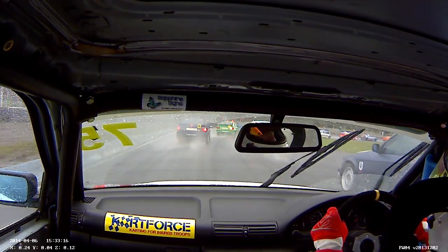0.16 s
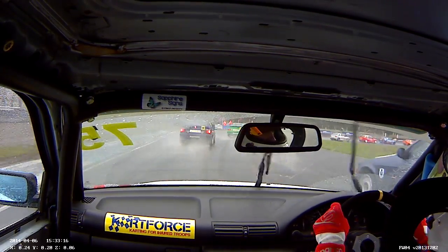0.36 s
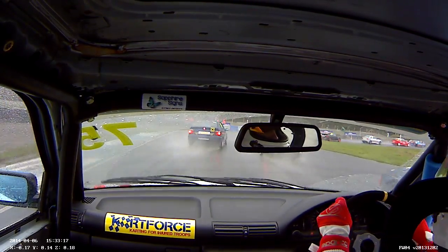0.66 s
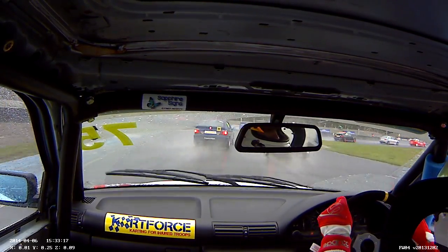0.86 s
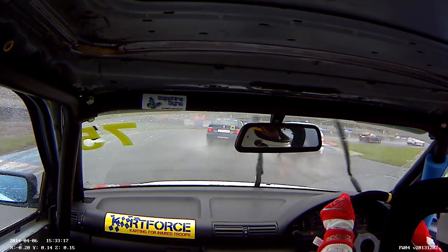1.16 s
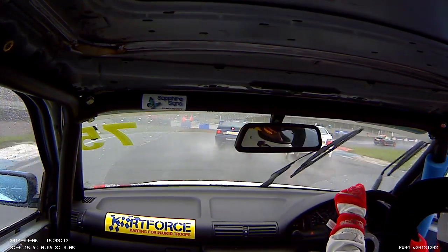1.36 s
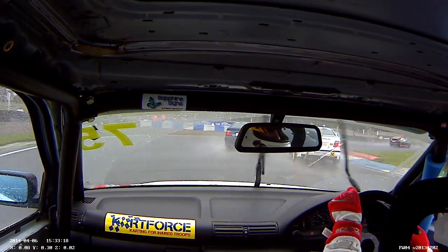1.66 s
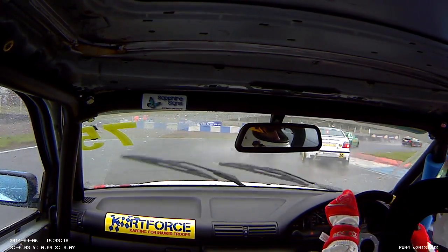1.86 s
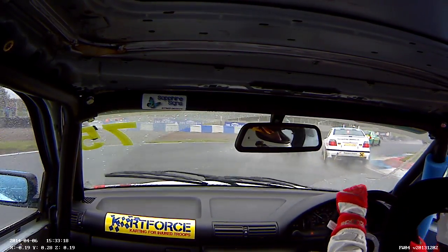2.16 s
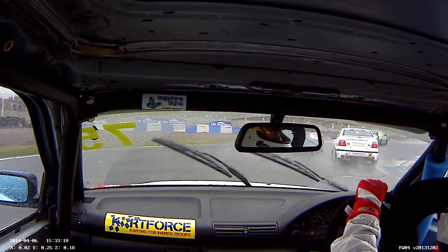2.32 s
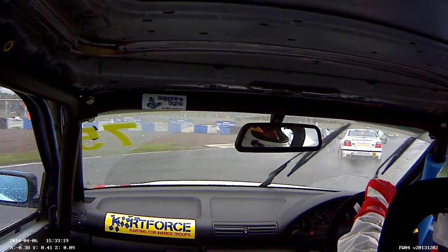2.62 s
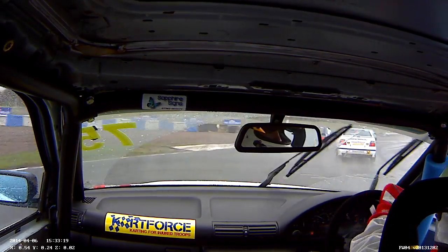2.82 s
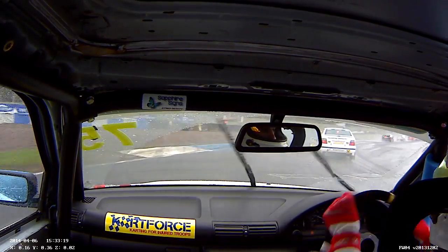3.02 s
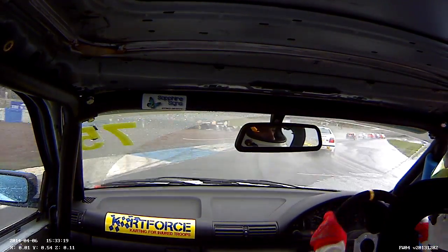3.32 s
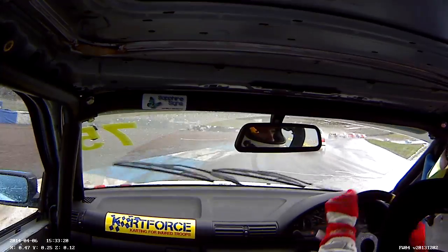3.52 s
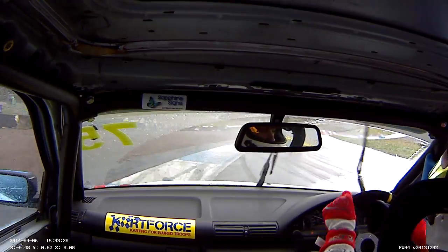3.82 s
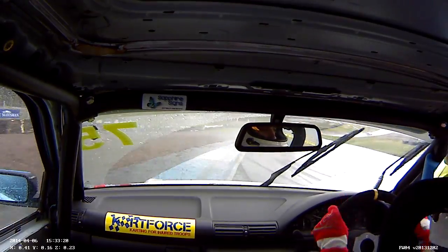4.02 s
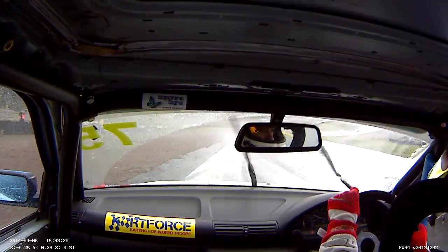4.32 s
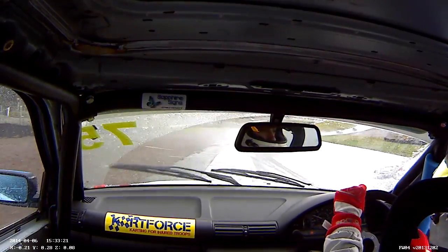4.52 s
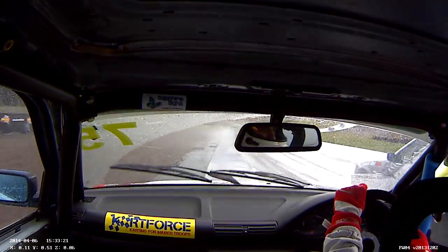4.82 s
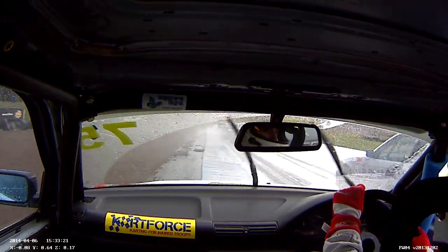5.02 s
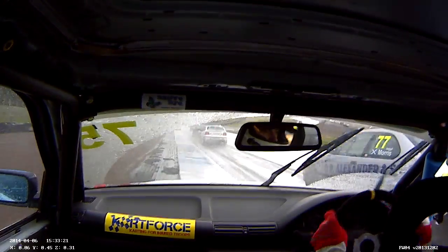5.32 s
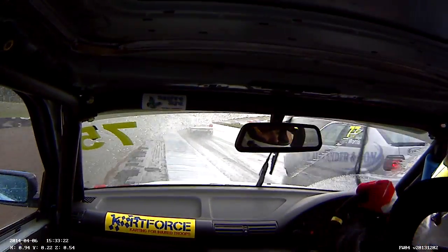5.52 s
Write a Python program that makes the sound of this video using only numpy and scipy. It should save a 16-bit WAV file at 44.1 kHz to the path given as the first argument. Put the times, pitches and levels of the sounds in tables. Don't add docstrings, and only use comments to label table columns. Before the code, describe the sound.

A mono recording inside a stripped race car on a wet track, picked up by a small camera whose case gives the highs a hollow colour. At first the engine coasts, a low drone sinking steadily from 0 to about 3.1 seconds, over deep rumble, booming shell roar and constant thin spray hiss. Small splashes tick at 0.35 and 0.8 seconds; the body shakes harder around 1.6. At 2.7 a heavy kerb thump overloads the microphone, with rattle and a burst of water, followed by a sharper knock near 3.1. From about 3.7 the throttle opens and the drone climbs, fuller and buzzier, briefly stuttering around 5.2. A rival's higher, harder exhaust emerges from 4.3 and grows alongside, with another faint car behind. Thumps return at 5.0, 5.2 and 5.6 as road roar swells. At 5.64 a stone cracks brightly, with tiny rapid bounces, amid a final heavy jolt.

```python
import sys
import numpy as np
from scipy import signal
from scipy.fft import rfft, irfft
from scipy.io import wavfile
from scipy.ndimage import uniform_filter1d

SR = 44100
rng = np.random.default_rng(int(sys.argv[2]) if len(sys.argv) > 2 else 0)


def field_ratio(decibels):
    return 10 ** (np.asarray(decibels, dtype=float) / 20)


def generate_wav(sig):
    pcm = np.round(np.clip(np.atleast_2d(sig).T, -1, 1) * 32767).astype(np.int16)
    wavfile.write(sys.argv[1], SR, pcm)


N = 250047
T = np.arange(N) / SR
HZ = np.fft.rfftfreq(N, 1 / SR)

# (time [s], firing rate [Hz], firing tone level [dB])
ENGINE_CURVE = [(0.0, 148.7, -36), (0.4, 143.1, -37.5), (1.23, 126.3, -27), (1.45, 120.8, -19),
                (1.88, 113.1, -22.5), (2.51, 104.8, -24.5), (2.84, 95.5, -23), (3.11, 90.46, -21),
                (3.36, 91.8, -24), (3.62, 90.04, -24.5), (3.81, 98.6, -20), (4.07, 99, -20.5),
                (4.42, 102.4, -17), (4.74, 106.4, -17), (5.05, 118.4, -14), (5.15, 125, -15.5),
                (5.4, 121.4, -19), (5.67, 143.8, -20)]


def unit(x):
    return x / np.sqrt(np.mean(x ** 2))


def columns(table):
    times, *values = np.transpose(table)
    return [np.interp(T, times, column) for column in values]


def walk(rate):
    hold = int(SR / rate)
    steps = np.repeat(rng.standard_normal(N // hold + 1), hold)
    return 0.8 * uniform_filter1d(uniform_filter1d(steps, hold), hold)[:N]


def shaped(points, x):
    hz, db = np.transpose(points)
    curve_db = np.interp(np.log(HZ + 1), np.log(hz), db, left=-80, right=-80)
    return unit(irfft(rfft(x) * field_ratio(curve_db), N))


def hollow(hz, centre_hz, width_hz):
    return 1 / (1 + 1j * (hz ** 2 - centre_hz ** 2) / (np.maximum(hz, 1) * width_hz))


def burst(start, rise, fall):
    t = np.maximum(T - start, 0)
    return (1 - np.exp(-t / max(rise, 1e-4))) * np.exp(-t / max(fall, 1e-3))


def tone(turns, multiple, wobble_db, rate):
    loudness = np.sqrt(2) * field_ratio(wobble_db * walk(rate))
    return loudness * np.sin(2 * np.pi * multiple * turns + 0.28 * wobble_db * walk(rate))


def panels(hz):
    # (frequency [Hz], width [Hz], lift [dB])
    door_modes = [(280, 40, 5), (370, 40, 3), (595, 60, 9), (682, 24, 9), (755, 26, 17), (788, 18, 5),
                  (850, 22, 12), (890, 35, 11)]
    return 1 + sum(field_ratio(up_db) * abs(hollow(hz, f, w)) ** 2 for f, w, up_db in door_modes)


def engine():
    # (multiple of firing rate, level coasting [dB], level on throttle [dB])
    overtone_levels = [(.5, -16, -14), (1.5, -30, -28), (2, -26, -15), (2.5, -22, -24), (3, -32, -20),
                       (4, -29, -26), (5, -36, -28), (6, -38, -37), (7, -40, -36), (8, -40, -35)]
    # (time [s], share of throttle open)
    throttle_curve = [(0, 0), (3.55, 0), (3.8, 1), (5.1, 1), (5.2, .4), (5.67, .4)]
    # (time [s], depth [dB], length [s])
    skips = [(2.762, -12, 0.029), (2.91, -25, 0.032), (3.672, -2, 0.058), (5.163, -28, 0.058),
             (5.24, -6, 0.062), (5.366, 0, 0.038), (5.475, -26, .03), (5.568, -16, 0.11)]
    hz, db = columns(ENGINE_CURVE)
    throttle = columns(throttle_curve)[0]
    for s, depth_db, length in skips:
        db = db + depth_db * np.exp(-(2 * (T - s) / length) ** 2)
    hz = uniform_filter1d(hz, SR // 20)
    turns = np.cumsum(hz) / SR
    overtones = 0
    for k, coasting_db, open_db in overtone_levels:
        level = field_ratio(coasting_db + (open_db - coasting_db) * throttle)
        overtones = overtones + level * panels(k * hz) * tone(turns, k, 4.6, 9)
    return field_ratio(db) * tone(turns, 1, 1.5, 14) + field_ratio(-28.5 + 1.9 * throttle) * overtones


def road():
    # (time [s], bumpiness [dB], tyre load [dB])
    track = [(0.0, -0.5, 1.7), (0.33, 4, -0.6), (0.65, -6.5, -2), (1.1, -2.5, 0.2), (1.45, -2, -0.3),
             (1.59, 9, 2.7), (1.75, 2.2, -0.3), (1.9, 5, 0.7), (2.26, -2.5, -1.8), (2.62, -6.5, -1.8),
             (3.0, -1, 3), (3.35, 5.5, 1.5), (3.81, 1, 2.4), (4.05, -5, 4), (4.61, -7.5, 4), (5.05, 10, 9),
             (5.5, 7, 6.5), (5.67, 1, 8)]
    # (time [s], level [dB])
    kerb_hits = [
        (2.72, -1.5),
        (3.09, -9),
    ]
    # (level at rest [dB], per bumpiness [dB/dB], per load [dB/dB],
    # per octave of revs [dB], kerb level [dB])
    ranges = [
        (-27.5, 0.97, 0.38, -2, -57),
        (-35, -0.1, 1.65, -3.0, -21.5),
        (-35, -0.1246, 0.94, -0.5, -40.5),
        (-40.5, -0.17, 0.69, 4.0, -29.5),
    ]
    # (frequency [Hz], level per Hz [dB])
    roar = [(60, -1), (130, 4), (220, -3), (300, -5.5), (400, -11.5), (470, -8.5), (520, -13), (640, -15),
            (900, -29.5)]
    # (frequency [Hz], level per Hz [dB])
    drum = [(500, -20), (700, -6.5), (890, 1), (1000, -1), (1180, -3), (1280, -12), (1400, -21)]
    shake = [(5, -25.0), (12, 5.0), (22, -6.5), (30, -12), (38, 4.4)]
    boom = [(28, -17.0), (47, 2), (70, -3.0), (95, -1)]
    colours, trims_db = [shake, boom, roar, drum], (2.2, 4.2, 3.58, 1.2)
    jolts_db = 0.25 * walk(25)
    bumps, load = columns(track)
    revs = np.log2(columns(ENGINE_CURVE)[0] / 110)
    kerbs = sum(field_ratio(db + 6.5) * burst(s, 0.011, 0.035) for s, db in kerb_hits)
    sound = 0
    for k, (db, per_bump, per_load, per_octave, kerb_db) in enumerate(ranges):
        level = field_ratio(db + per_bump * bumps + per_load * load + per_octave * revs) + field_ratio(kerb_db) * kerbs
        flicker_db = trims_db[k] + 0.99 * walk(12) + jolts_db * (k > 1)
        sound = sound + level * field_ratio(flicker_db) * shaped(colours[k], rng.standard_normal(N))
    return sound


def in_case(x, tilt_db):
    # (frequency [Hz], width [Hz], level [dB])
    case_modes = [(1424, 515, -8.5), (2018, 184, 2.5), (2655, 360, -7.5), (3650, 275, -3.5),
                  (4363, 338, 1.5), (4887, 900, -0.5), (5648, 604, -3.5), (6660, 760, -14.5)]
    # (frequency [Hz], width [Hz], depth [0-1])
    notch_hz, notch_width_hz, notch_depth = (6440, 550, 0.34)
    gain = 0
    for k, (f, w, db) in enumerate(case_modes):
        gain = gain + (-1) ** k * field_ratio(db) * hollow(HZ, f, w)
    gain = gain * (1 - notch_depth * hollow(HZ, notch_hz, notch_width_hz))
    gain = gain * field_ratio(tilt_db * np.log2(np.maximum(HZ, 800) / 4000))
    steep_top = 1 / np.sqrt(1 + (HZ / 7300) ** 36)
    gain = gain * (steep_top + field_ratio(-12.5) * abs(hollow(HZ, 8450, 500)) ** 2)
    no_bass = np.minimum(HZ / 1400, 1) ** 4
    return unit(irfft(rfft(x) * gain * no_bass, N))


def droplets(scatter_db):
    return rng.standard_normal(N) * field_ratio(scatter_db * walk(300))


def water():
    # (time [s], level [dB])
    spray = [(0.0, -40), (0.3, -40), (0.93, -42), (1.36, -40.5), (1.58, -43), (3.46, -42), (4.28, -40),
             (5.29, -40), (5.67, -38.5)]
    # (time [s], peak level [dB], fall [s], dull share [dB])
    splashes = [(0.346, -32, 0.0093, 0), (0.792, -33.5, 0.0094, -3.5), (2.315, -40.5, 0.039, -1),
                (2.53, -34, 0.013, -5.5), (2.692, -37.5, 0.022, 12), (2.706, -23, 0.017, -4.5),
                (2.724, -33, 0.034, 16), (2.743, -33, 0.017, -6), (2.775, -42, 0.016, -3),
                (3.065, -42, 0.028, -9), (3.143, -26, 0.017, -9), (3.163, -34, 0.022, -13),
                (3.642, -38.5, 0.04, 1.5), (3.692, -37.5, 0.052, -3), (4.068, -29.5, 0.018, -10),
                (4.075, -42, 0.14, -28), (4.182, -29.5, 0.028, -31), (4.48, -30, 0.022, -25),
                (4.643, -37, 0.061, -5), (4.805, -47, 0.0067, 9), (4.868, -37.5, 0.04, -15),
                (4.925, -39, 0.0055, 8), (4.979, -43, .015, 7.5), (5.059, -31.5, 0.0039, 9),
                (5.25, -42, 0.012, 15), (5.622, -39.5, 0.03, 8.5)]
    spray_db = columns(spray)[0] + 1.0 + 0.24 * walk(9) + 0.73 * walk(30)
    sound = field_ratio(spray_db) * in_case(droplets(0.71), 0.061)
    slap = irfft(rfft(droplets(2.7)) * hollow(HZ, 5500, 4500), N)
    bright, dull = in_case(slap, 3.0), in_case(droplets(2.4), -12.0)
    for s, db, fall, dull_db in splashes:
        sound = sound + field_ratio(db + 2.5) * burst(s, 0.0049, fall) * (bright + field_ratio(dull_db - 7) * dull)
    return sound


def thumps():
    # (frequency [Hz], level per Hz [dB])
    rattle_colour = [(100, -17.5), (150, 5.5), (200, 1.5), (250, -4), (330, 1), (400, -5), (600, -13.5),
                     (820, -9), (1200, -17.5), (1500, -26), (2000, -21), (2400, -28.5), (3000, -51.5)]
    # (time [s], level [dB], rise [s], fall [s])
    rattles = [(2.691, -15.5, 0.014, 0.045), (2.76, -35, 0.0092, 0.025), (4.977, -21, 0.0026, 0.028),
               (5.604, -26.5, 0.023, 0.028), (3.081, -21, 0.0021, 0.014), (3.088, -20.5, 0.0029, 0.046)]
    # (time [s], peak [dB], frequency [Hz], time to fall 60 dB [s], first swing [1 up, -1 down])
    swings = [(2.79, -10, 22, .4, 1), (3.0795, -5, 130, .045, -1), (4.225, -7, 16, .4, -1),
              (2.662, -4, 33, .3, -1), (2.678, 0, 25, .09, 1), (3.0875, -6, 115, .07, -1),
              (4.97, -10, 22, .3, -1), (5.222, -5.5, 14.5, .4, -1), (5.556, -3, 24, .2, -1),
              (5.612, -6, 16, .15, -1), (5.6435, -9, 50, .06, -1), (5.66, 5, 20, .4, 1)]
    shaking = sum(field_ratio(db + 5.0) * burst(s, rise, fall) for s, db, rise, fall in rattles)
    sound = shaped(rattle_colour, droplets(0.61)) * shaking
    for s, db, hz, t60, sign in swings:
        swing = np.sin(2 * np.pi * hz * np.maximum(T - s, 0))
        sound = sound + sign * field_ratio(db + 5) * burst(s, 0.24 / hz, t60 / np.log(1000)) * swing
    return sound


def rivals():
    # (time [s], firing rate [Hz])
    rival_revs = [(3.85, 151), (4.45, 169.5), (4.75, 177), (5.0, 185.5), (5.2, 190.8), (5.35, 196.3),
                  (5.67, 206.5)]
    # (time [s], distance [m])
    rival_path = [(3.7, 130), (3.8, 8), (4.3, 9), (4.5, 13), (4.75, 4.1), (5.05, 2.4), (5.4, 1.92),
                  (5.67, 1.93)]
    # (multiple of firing rate, level [dB])
    rival_overtones = [(2, -6.5), (2.75, -18.5), (3, -13.5), (3.75, -27), (4, -15.5), (4.25, -23),
                       (4.75, -18), (5, -16.5), (6, -27.5)]
    # (time [s], firing rate [Hz], level [dB])
    third_car = [(4.15, 181, -55), (4.3, 186, -31), (4.5, 192, -31), (4.75, 200, -33), (5.0, 209, -37),
                 (5.2, 214, -55)]
    hz = columns(rival_revs)[0]
    metres = np.maximum(columns(rival_path)[0], 1)
    turns = np.cumsum(hz) / SR

    def turn_at(s):
        return 1 / (1 + np.exp(-(T - s) / 0.094))

    beam = turn_at(4.344) - 0.3 * turn_at(5.36)
    overtones = 0
    for k, db in rival_overtones:
        through_door = panels(k * hz) ** 1.166
        overtones = overtones + field_ratio(db) * through_door * tone(turns, k, 3.0, 8)
    note = field_ratio(-14.5) / metres * tone(turns, 1, 0.48, 4.9)
    far_hz, far_db = columns(third_car)
    far = field_ratio(far_db) * tone(np.cumsum(far_hz) / SR, 1, 2.2, 7)
    return note + field_ratio(-35) * beam * overtones + far


def stone():
    # (time [s], level [dB])
    hits = [
        (5.6440, 4),
        (5.64596, -2),
        (5.6479, -9),
    ]
    # (frequency [Hz], level [dB], time to fall 60 dB [s])
    ringing = [(2083, -13, .014), (3639, -11, .014), (4720, 0, .009), (5100, -7, .008), (5450, -5, .013)]
    sound, crack = 0, in_case(rng.standard_normal(N), 9.1)
    for s, db in hits:
        t = np.maximum(T - s, 0)
        sound = sound + field_ratio(db - 20) * burst(s, .0002, .0015) * crack
        for hz, mode_db, t60 in ringing:
            fading = np.exp(-t * np.log(1000) / t60)
            sound = sound + field_ratio(db + mode_db - 7) * fading * np.sin(2 * np.pi * hz * t)
    return sound


def scene():
    return (engine() + road() + water() + thumps() + rivals() + stone())[None]


def band_limit(x):
    return signal.sosfilt(signal.butter(12, 15700, fs=SR, output="sos"), x)


def record(dry):
    flat = np.clip(dry, -.707, .707)
    sagged = signal.lfilter([1, -1], [1, -np.exp(-2 * np.pi * 1.5 / SR)], flat)
    top_hz = 9100
    treble_cut = signal.cheby2(12, 70, 1.1 * top_hz, fs=SR, output="sos")
    narrow = signal.sosfilt(treble_cut, sagged)
    return band_limit(np.clip(narrow, -.715, .715))


dry = scene()
out = record(dry)
generate_wav(out)
```